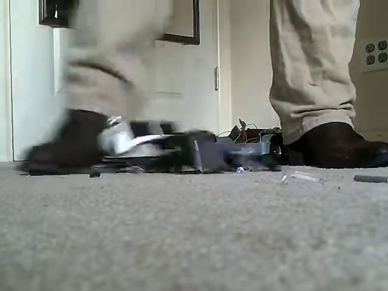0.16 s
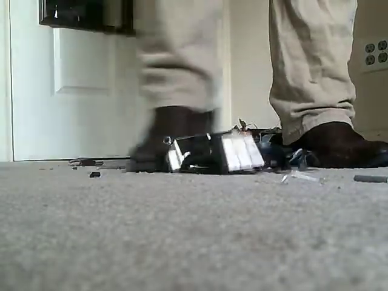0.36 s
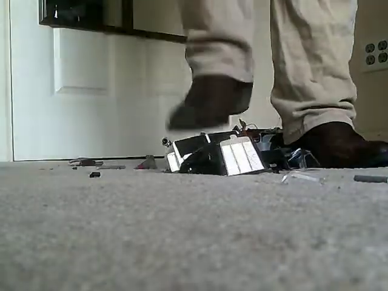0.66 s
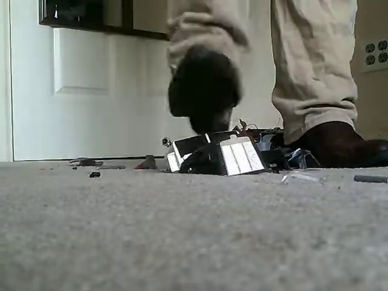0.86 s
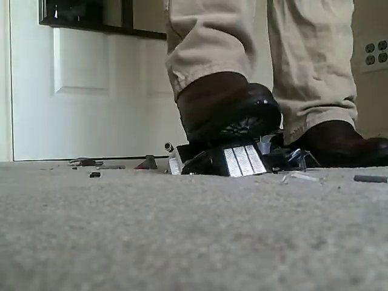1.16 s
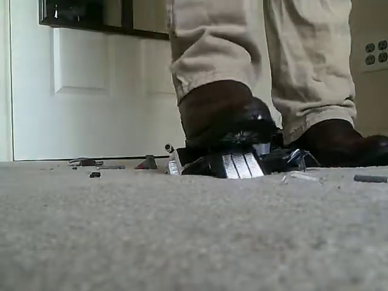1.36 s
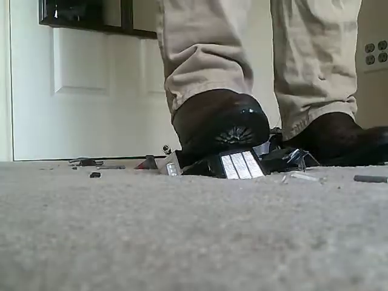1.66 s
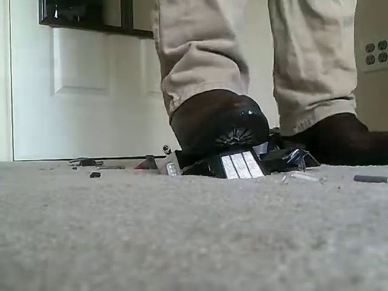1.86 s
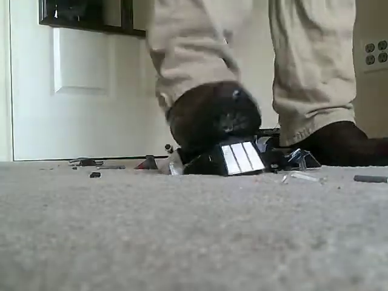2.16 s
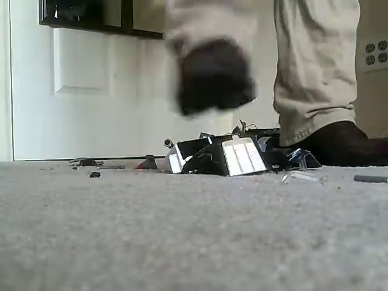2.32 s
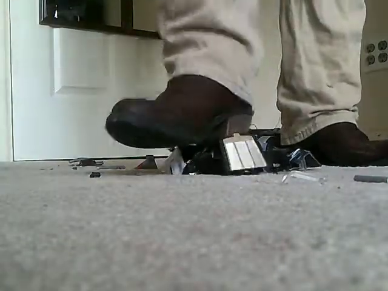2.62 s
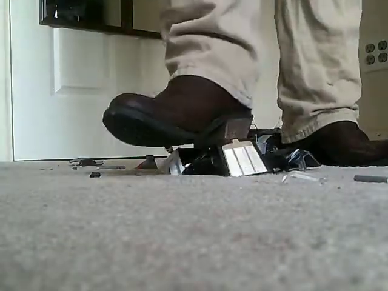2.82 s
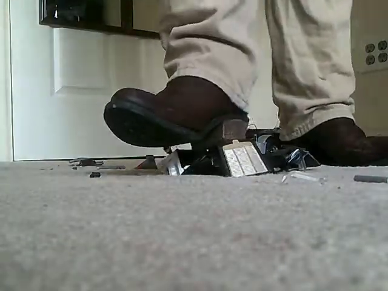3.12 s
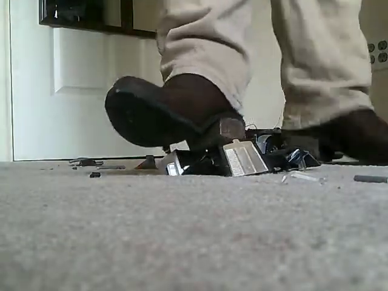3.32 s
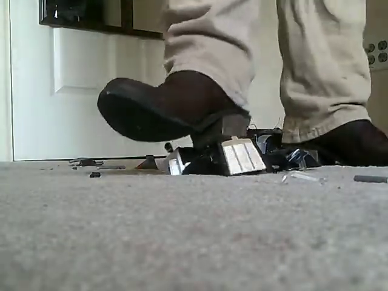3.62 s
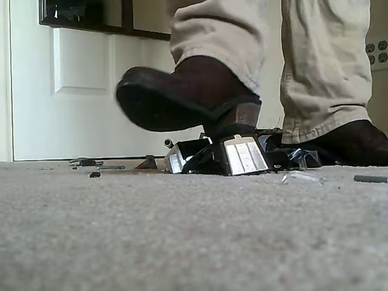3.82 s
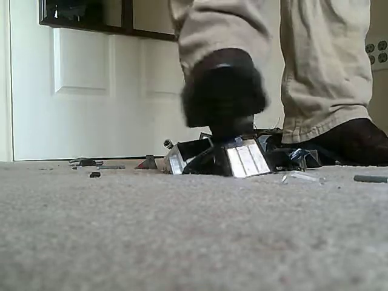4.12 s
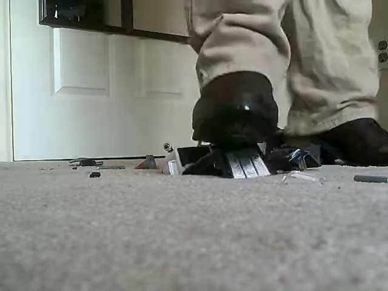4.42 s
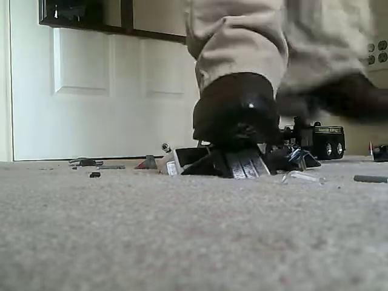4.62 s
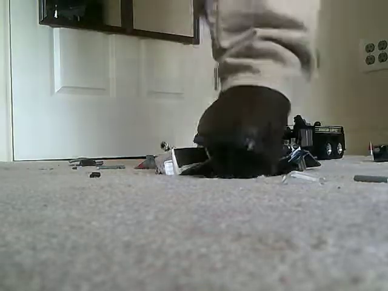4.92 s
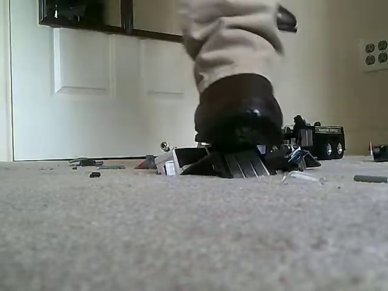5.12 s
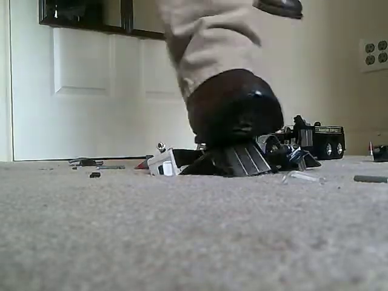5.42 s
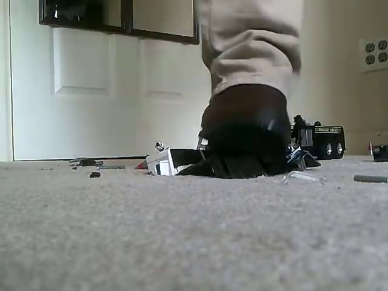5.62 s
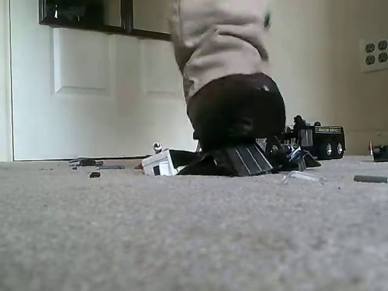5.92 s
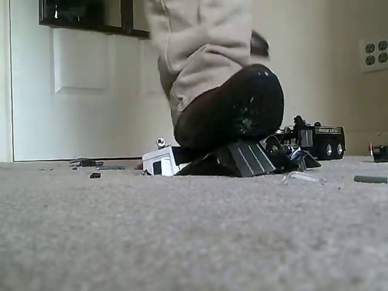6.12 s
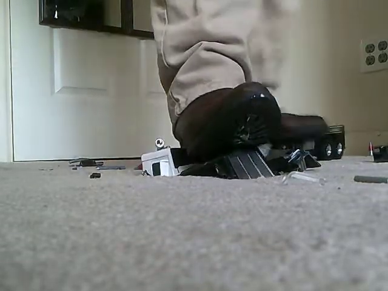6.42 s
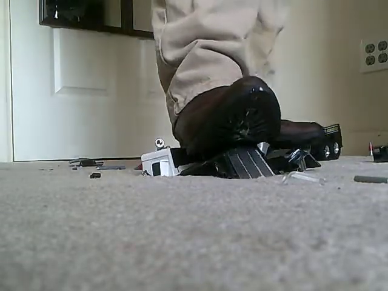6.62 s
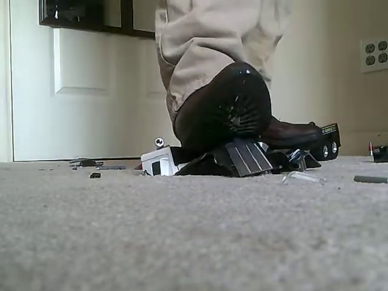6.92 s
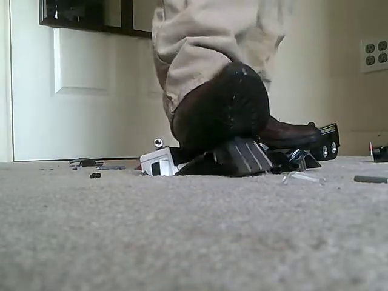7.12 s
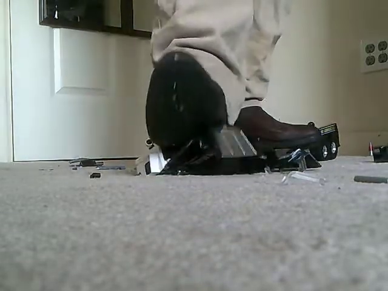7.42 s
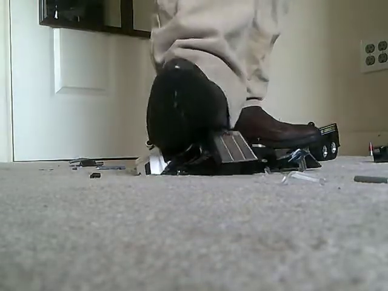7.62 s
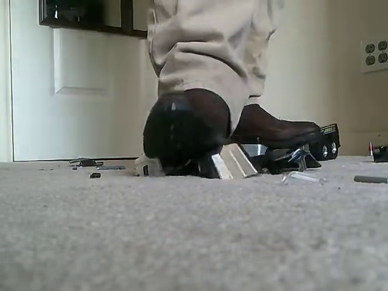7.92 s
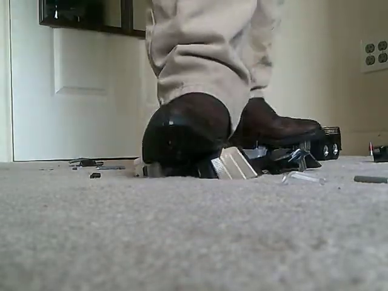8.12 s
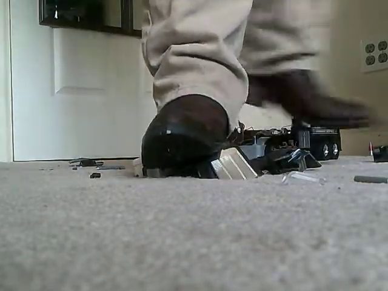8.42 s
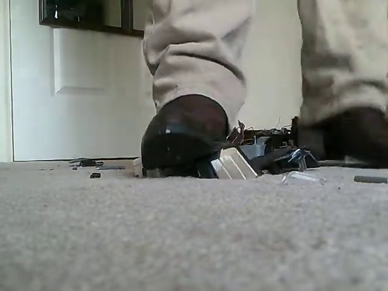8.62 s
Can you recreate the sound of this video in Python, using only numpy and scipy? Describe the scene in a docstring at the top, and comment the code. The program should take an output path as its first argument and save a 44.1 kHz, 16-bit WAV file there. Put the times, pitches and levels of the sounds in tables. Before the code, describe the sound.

A low house-fan hum with soft rushing air runs throughout in a small carpeted room, heard from about a metre away near the floor. From 0 to 0.5 s brittle plastic cracks and hollow rattles come in a quick cluster. Around 0.95 s a crunch and dull knock, with smaller snaps to 1.4. At 1.46 a loud, sharp crack lands with a deep floor boom. Another crunchy knock follows at 2.1, lighter clicks at 2.55, then near quiet, with a soft thud at 3.5 and faint ticks to 4.9. Hollow ringing cracks build at 5.1, 5.5 and 5.7. At 5.9-6.1 the heaviest stomp smashes the plastic in a dense, overloaded crunch with booming boards. A bright ringing crack at 6.37 leads to snaps, short rasps and knocks until 7.25. After a lull, small hollow crackles and a rasp come around 7.8-8.2, then faint rustle and hum.

```python
"""Plastic toy crushed under a boot

A boot cracks and crunches a hollow plastic toy on a carpeted floor, with the microphone a metre away on the carpet.
Noise tears excite shard and shell modes; hollow rings, stick-slip rasps and grains of crunching join them.
The floor knocks, booms and sways as damped modes and low noise, and crossfading noise tails give a small room.
A house fan hums behind as sines and filtered noise; the loudest blows saturate the input stage."""
import sys
import numpy as np
from scipy import signal
from scipy.fft import rfft, irfft
from scipy.io import wavfile
from scipy.ndimage import uniform_filter1d

SR = 44100
rng = np.random.default_rng(int(sys.argv[2]) if len(sys.argv) > 2 else 0)


def persist_wave(psi):
    """Save psi, clipped to +-1, as 16-bit WAV."""
    counts = np.round(np.clip(psi, -1, 1) * 32767).astype(np.int16)
    wavfile.write(sys.argv[1], SR, np.atleast_2d(counts).T)


def magnitude_from_level(level_db):
    """Linear magnitude for a level in decibels (20 dB per decade)."""
    exponent = np.asarray(level_db, float) / 20
    return 10 ** exponent


N = 386316
T = np.arange(N) / SR
RATTLE_DB = 3.5  # spread of the level as loose pieces chatter against a ringing part


def unit(x):
    """Normalisation: scale to rms 1."""
    return x / np.sqrt(np.mean(x ** 2))


def colour(x, points):
    """Minimum-phase filtering: a causal filter through (Hz, dB) points, from the cepstrum of the log gain."""
    hz, db = np.transpose(points)
    size = 2 ** 13
    grid_hz = np.arange(size + 1) * SR / size / 2
    log_gain = np.interp(np.log(grid_hz + 1), np.log(hz), db) * np.log(10) / 20
    cepstrum = irfft(log_gain)
    cepstrum[1:size] *= 2  # fold onto positive time
    response = irfft(np.exp(rfft(cepstrum[:size], 2 * size)))
    return signal.fftconvolve(x, response)[:N]


def band(x, hz, width):
    """Resonance: two poles, gain 1 at the centre."""
    return signal.lfilter(*signal.iirpeak(hz, hz / width, SR), x)


def decay(t, t60):
    """Exponential decay: 60 dB down after t60 seconds."""
    return np.exp(-np.log(1000) * t / t60)


def ring(t, hz, t60, phase=0):
    """Damped oscillation: a sine that decays exponentially."""
    return np.sin(2 * np.pi * hz * t + phase) * decay(t, t60)


def add(out, x, s):
    """Superposition: mix x in at time s."""
    i = int(s * SR)
    out[i:i + len(x)] += x[:len(out) - i]


def walk(rate):
    """Slow random modulation: levels held 1 / rate s and smoothed twice; spread near 1."""
    k = int(SR / rate)
    steps = np.repeat(rng.standard_normal(N // k + 1), k)
    return 1.3 * uniform_filter1d(uniform_filter1d(steps, k), k)[:N]


def wobble(size, hold):
    """Fast random modulation: noise averaged over hold seconds, rms 1."""
    return unit(uniform_filter1d(rng.standard_normal(size), int(hold * SR)))


def burst(db, held, fade):
    """Envelope: a quick rise, a hold, then a steady fall in dB per s."""
    t = T[:SR // 2]
    rise = 1 - np.exp(-t / 0.0045)
    return magnitude_from_level(db - fade * np.maximum(t - held, 0)) * rise


# Cracks of the plastic, levels before the room and the microphone
# columns: start_s, peak_db (of the ringing body), shard_pitch_hz, snap_db (rms)
CRACK_EVENTS = [(0.04, -11, 860, -28.5), (0.173, -40, 506, -40), (0.182, -19, 807, -50),
                (0.207, -14, 860, -36), (0.25, -10.5, 800, -27), (0.279, -13, 1200, -29),
                (0.302, -7.5, 1064, -27.5), (0.316, -13, 1060, -53), (0.431, -23.5, 970, -50),
                (0.518, -53, 740, -54), (0.915, -15, 735, -34), (0.956, -32, 700, -43),
                (0.978, -9.5, 552, -37.5), (1.178, -12.5, 817, -44.5), (1.283, -24.5, 935, -52.5),
                (1.29, -28, 790, -37.5), (1.311, -22.5, 840, -47.5), (1.355, -26, 813, -49),
                (1.43, -36, 694, -54.5), (1.461, 8.5, 798, -8), (1.941, -22.5, 756, -48.5),
                (2.112, -19, 770, -55), (2.128, -4, 740, -34), (2.153, -10.5, 501, -34),
                (2.205, -19.5, 785, -43), (2.54, -13.5, 606, -52), (2.563, -26, 586, -40),
                (2.591, -19, 590, -50), (3.495, -25, 623, -62), (3.655, -23, 800, -54),
                (3.69, -25, 920, -51), (4.112, -25, 950, -51.5), (4.259, -19.5, 717, -55),
                (4.279, -32, 770, -48.5), (4.328, -27, 1090, -51), (4.757, -23, 820, -57),
                (4.795, -22.5, 865, -58), (4.807, -18.5, 907, -55), (4.831, -18, 685, -58),
                (4.854, -20, 677, -60), (4.928, -14.5, 850, -41.5), (5.062, -8.5, 994, -30.5),
                (5.142, 2, 1001, -24), (5.323, -17.5, 920, -39), (5.352, -17, 793, -40.5),
                (5.514, -3, 780, -34.5), (5.56, -17, 1040, -33.5), (5.677, 6, 972, -20.5),
                (5.893, -10.5, 871, -42), (5.922, -9, 898, -24.5), (5.945, 4, 988, -8),
                (5.967, -5, 1282, -3), (5.976, -0.5, 591, -3), (5.99, 0.5, 693, -3.5),
                (5.999, 0, 725, -4.5), (6.339, -18.5, 1132, -45), (6.35, -6, 1180, -36),
                (6.371, 8, 1010, -14.5), (6.38, -3.5, 1000, -25), (6.39, -1, 995, -22.5),
                (6.472, -6.5, 740, -43), (6.542, -11, 730, -40), (6.621, -6.5, 1173, -31.5),
                (6.653, -11.5, 740, -37), (6.689, -14, 687, -51), (6.712, -13, 690, -38),
                (6.772, -22.5, 770, -34.5), (6.955, -24.5, 1030, -50.5), (7.082, -25, 608, -65),
                (7.146, -13, 985, -48.5), (7.249, -5, 904, -25), (7.813, -26.5, 970, -48.5),
                (7.939, -13.5, 1126, -56), (7.957, -13, 866, -56), (7.978, -9.5, 720, -57),
                (8.028, -21.5, 760, -60), (8.085, -25.5, 840, -63), (8.184, -22.5, 973, -61)]


def cracks():
    """Impulsive excitation: each tear rings shard and shell, and a bright snap rides on its front."""
    out = np.zeros(N)
    for s, peak_db, shard_hz, snap_db in CRACK_EVENTS:
        tear = tearing(peak_db)
        body = crack_body(tear, shard_hz)
        add(out, magnitude_from_level(peak_db) * body / np.abs(body).max(), s)
        add(out, crack_snap(tear, peak_db, snap_db), s)
    return out


def tearing(peak_db):
    """Fracture noise: cubed noise makes sparse spikes, in a sharp burst with a weak, longer train of aftershocks."""
    t = T[:SR // 25]
    fall = np.exp(-t / 0.00045) + magnitude_from_level(-19) * np.exp(-t / 0.011)
    rise_s = 0.00019 * magnitude_from_level(-0.5 * peak_db)  # soft cracks tear open more slowly
    return rng.standard_normal(len(t)) ** 3 * fall * (1 - np.exp(-t / rise_s))


# Modes of the hollow toy body; level and pitch are nominal
# columns: pitch_hz, level_db, t60_s
SHELL_MODES = [(454, -14.5, 0.06), (562, -8, 0.015), (770, -3, 0.0098), (820, -0.5, 0.032),
               (920, -8.5, 0.018), (1020, -4.5, .06), (1277, -13, 0.029), (1595, -17, 0.033),
               (1748, -10.5, 0.045), (1940, -20.5, 0.036), (2390, -20.5, 0.043), (2760, -20.5, .03),
               (2920, -25.5, .03)]


def crack_body(tear, shard_hz):
    """Modal response: the tear convolved with damped modes of the shard and the shell."""
    t = T[:SR // 8]
    hz, db, t60 = np.transpose(SHELL_MODES)[:, :, None]
    # the sole damps and bends the shell differently at every crack
    level_chance, pitch_chance = rng.standard_normal((len(SHELL_MODES), 2)).T[:, :, None]
    bent_hz = hz * (1 + 0.088 * pitch_chance)
    shell = np.sum(magnitude_from_level(db + 7.1 * level_chance) * ring(t, bent_hz, t60), axis=0)
    partials = [(1, -2.5), (0.99, 5.0), (0.77, -5.5), (0.52, -17.5)]  # pitch ratio, dB
    shard = sum(magnitude_from_level(gain_db) * ring(t, ratio * shard_hz, 0.022) for ratio, gain_db in partials)
    push = uniform_filter1d(tear, size=9)  # thick plastic gives way over a fifth of a millisecond
    body = signal.fftconvolve(push, shard + magnitude_from_level(-6.0) * shell)
    return body * magnitude_from_level(RATTLE_DB * wobble(len(body), 0.0039))


def crack_snap(tear, peak_db, snap_db):
    """Resonant filtering: broad bands pass the treble of the tear, with a thin top above."""
    snap_hz = 2313 * np.exp(0.21 * rng.standard_normal())  # scatters from crack to crack
    snap = band(tear, snap_hz, 870) + magnitude_from_level(-4.5) * band(tear, 3700, 3500)
    snap = band(snap, 2800, 4300)
    thin = band(band(tear, 5300, 3500), 5300, 3500)
    thin_db = -28 + 0.8 * peak_db + 0.6 * snap_db  # grows with both the peak and the snap
    return magnitude_from_level(snap_db) * unit(snap) + magnitude_from_level(thin_db) * unit(thin)


# The hollow toy rings on when the sole lets it
# columns: start_s, level_db (before the chatter), pitch_hz (at the start)
HOLLOW_RINGS = [(0.044, -21.5, 1140), (0.308, -23, 1104), (0.435, -37, 1008), (5.144, -19, 1036),
                (5.518, -24.5, 1048), (5.68, -10, 1009), (6.377, -4.5, 955.5), (7.98, -29, 897)]


def hollow():
    """Damped oscillation: a rough ring climbs as the toy is squeezed, with a weaker neighbour below."""
    out, t = np.zeros(N), T[:SR // 5]
    t60_s, glide_per_s, wobble_rad = 0.19, 1.3, 0.8
    for s, db, hz in HOLLOW_RINGS:
        for ratio, gain_db in [(1, -0.5), (.9, -7)]:
            climbing_hz = ratio * hz * (1 + glide_per_s * t / 2)  # half, as phase integrates pitch
            tone = ring(t, climbing_hz, t60_s, wobble_rad * wobble(len(t), 0.011))
            level = magnitude_from_level(db + gain_db + RATTLE_DB * wobble(len(t), 0.0065))
            add(out, level * tone * (1 - np.exp(-t / 0.0022)), s)
    return out


# A plate drags under the sole and rasps at its own pitch
# columns: start_s, level_db, held_s, pitch_hz
RASP_EVENTS = [(0.204, -31, .015, 2550), (6.441, -36, 0.077, 2300), (6.622, -36.5, 0.11, 2150),
               (7.94, -35.5, 0.049, 2000)]


def rasp():
    """Stick-slip friction: uneven clicks drive one narrow resonance."""
    out = np.zeros(N)
    slips_per_s, width_hz, fade_db_per_s = 370, 320, 400
    for s, db, held, hz in RASP_EVENTS:
        shape = burst(db, held, fade_db_per_s)
        slips = rng.standard_normal(len(shape)) * (rng.random(len(shape)) < slips_per_s / SR)
        tone = band(band(slips, hz, width_hz), hz, 2 * width_hz)
        add(out, shape * unit(tone), s)
    return out


def fractures():
    """Granular excitation: each shell mode is struck by its own patter, some grains louder than the rest."""
    low, high = np.zeros(N), np.zeros(N)
    for hz, db, _ in SHELL_MODES:
        at = rng.integers(0, N, size=N // 80)
        strength = rng.standard_normal(len(at)) * magnitude_from_level(2.4 * rng.exponential(size=len(at)))
        grains = np.bincount(at, strength, N)
        mode = band(band(grains, hz, 0.17 * hz), hz, 2.1 * hz)
        add(low if hz < 1600 else high, magnitude_from_level(0.6 * db) * mode, 0)
    return unit(low), unit(high)


# Bursts of dense crunching under the sole
# columns: start_s, low_modes_db, high_modes_db, held_s, low_fade_db_per_s
CRUNCH_BURSTS = [(0.043, -23, -20.5, 0.0055, 206), (0.18, -32, -38, .005, 451),
                 (0.206, -29.5, -26, .005, 303), (0.25, -28, -30, .065, 351),
                 (0.916, -24, -28.5, 0.012, 500), (0.977, -28, -19.5, 0.0043, 1205),
                 (1.177, -28.5, -52, 0.0057, 500), (1.283, -35, -46, 0.018, 497),
                 (1.461, -7.5, -13, .004, 451.5), (2.106, -13, -22, 0.0065, 1502),
                 (2.127, -19, -22, 0.0083, 452), (2.153, -29, -32, 0.0092, 352),
                 (2.21, -38, -43, 0.016, 300), (2.54, -35.5, -35, 0.022, 600), (2.585, -36, -32, .004, 450),
                 (3.65, -46, -50, 0.052, 300), (4.11, -45, -53, 0.0088, 500),
                 (4.182, -37.5, -47, .005, 202), (4.258, -45, -46, .005, 280), (4.79, -47, -69, 0.044, 402),
                 (5.14, -20, -38, 0.0035, 303), (5.508, -28.5, -49, 0.003, 260),
                 (5.675, -22, -41.5, 0.0035, 308), (5.892, -26, -41, 0.0028, 903),
                 (5.92, -23, -28, .004, 1500), (5.943, 0.5, -10.5, 0.037, 289),
                 (6.365, -10, -20.5, 0.0088, 180), (6.458, -15.5, -21, 0.021, 443),
                 (6.518, -23, -31, 0.011, 274), (6.619, -28, -43, 0.063, 300), (6.772, -41, -36, .004, 396),
                 (6.952, -43, -59, 0.027, 244), (7.247, -19.5, -34, .004, 494),
                 (7.935, -24, -44, 0.021, 349), (8.02, -39.5, -63, 0.095, 503),
                 (8.174, -45.5, -70, 0.052, 301)]


def crunch(low, high):
    """Amplitude modulation: bursts shape the tiny fractures, the high modes fading faster."""
    body, bright = np.zeros(N), np.zeros(N)
    for s, low_db, high_db, held, fade in CRUNCH_BURSTS:
        add(body, burst(low_db, held, fade), s)
        add(bright, burst(high_db, held, 1.82 * fade), s)
    return body * low + bright * high


# Faint rustle of shifting pieces, joined by straight lines in dB
# columns: time_s, level_db (of the low modes, before the random wander)
RUSTLE_LEVEL = [(0, -49.5), (.55, -57.5), (.8, -60), (3.4, -58.5), (3.7, -54.5), (4.3, -59), (4.85, -51.5),
                (5.6, -51), (7.2, -56), (7.6, -59.5), (8.1, -58.5), (8.7, -61.5)]


def rustle(low, high):
    """Amplitude modulation: the same fractures at a faint, randomly wandering level."""
    level = magnitude_from_level(np.interp(T, *np.transpose(RUSTLE_LEVEL)) + 4.4 * walk(25))
    return level * (low + magnitude_from_level(-11.5) * high)


# The floor takes the weight
# columns: start_s, knock_db (peak before the soft onset), knock_pitch_hz (nominal), boom_db (of its 44 Hz mode)
FLOOR_BLOWS = [(0.979, -12, 204, -38), (1.465, 4.5, 178.2, -8), (2.128, -6, 171, -19),
               (3.349, -46, 137, -28), (3.492, -17, 111, -55), (4.751, -28, 96.5, -24.5),
               (5.139, -19, 151, -31), (5.323, -16.5, 154, -27), (5.516, -14.5, 110, -29),
               (5.673, -24, 210, -35.5), (5.919, -9.5, 100, -21), (5.946, 6.5, 92.8, -4),
               (5.978, 4.5, 109, -2.5), (6.031, 2, 102, -30), (6.09, -16, 114.6, -17),
               (6.372, -5.5, 323, -34), (6.687, -23, 115.8, -24), (6.777, -13, 185, -42),
               (7.079, -16.5, 100, -48), (7.146, -21.5, 108.3, -51), (7.247, -8, 167.4, -23)]


def floor():
    """Modal response: blows knock the boards at a dull note with short overtones, over a deep boom."""
    out, t = np.zeros(N), T[:SR // 2]
    boom = ring(t, 44, .25) + magnitude_from_level(-7) * ring(t, 68, .15) + magnitude_from_level(-3) * ring(t, 104, .25)
    mode_gain = magnitude_from_level([[-4], [0], [-4], [-6], [-7], [-9]])
    for s, knock_db, hz, boom_db in FLOOR_BLOWS:
        ratio = np.array([[.7], [1], [1.4], [2.1], [3.1], [4.6]])
        ratio = ratio * (1 + 0.13 * rng.standard_normal((6, 1)))
        t60 = 0.094 / ratio ** 0.09  # higher modes die slightly sooner
        knock = np.sum(mode_gain * ring(t, hz * ratio, t60), axis=0)
        blow = magnitude_from_level(knock_db) * knock / np.abs(knock).max() + magnitude_from_level(boom_db) * boom
        add(out, blow * (1 - np.exp(-t / 0.0017)), s)
    return out


def room(x, count=3):
    """Reverberation: decaying noise tails crossfade in turn, so the small room's echo colour keeps varying."""
    out = np.zeros(N)
    for k in range(count):
        share = 2 / count * np.cos(np.pi * (6.0 * T + k / count)) ** 2  # six cycles a second
        out = out + signal.oaconvolve(x * share, tail())[:N]
    return out


# Bands of the room's dense tail
# columns: pitch_hz, t60_s, level_db
ROOM_BANDS = [(159, 0.16, 0.5), (533, 0.13, -4.5), (1420, 0.27, -7), (4000, 0.067, -8.5), (7460, 0.3, -2)]
# Reflections from the nearest walls
# columns: delay_s, level_db
WALL_ECHOES = [(.0055, -19), (.015, -15.5), (.025, -21.5)]


def tail():
    """Impulse response: clear early reflections and dense noise, each band fading at its own pace."""
    t = T[:SR // 3]
    out = np.zeros(len(t))
    for hz, t60, db in ROOM_BANDS:
        part = band(rng.standard_normal(len(t)), hz, hz) * decay(t, t60)
        part = part * (1 - np.exp(-(t / 0.0059) ** 2))  # gradual build-up
        out = out + magnitude_from_level(db) * part * np.sqrt(2 * hz / SR / np.sum(part ** 2))
    for s, db in WALL_ECHOES:
        add(out, magnitude_from_level([db]), s)
    return out


# Slow sway of the floor as the weight shifts, joined by straight lines in dB
# columns: time_s, level_db
SWAY_LEVEL = [(0.0, -44), (0.8, -49), (1.31, -44), (1.48, -28), (1.87, -48), (2.2, -37), (2.75, -43),
              (3.93, -44), (5.19, -29), (5.82, -32), (5.96, -19), (6.35, -35), (7.12, -48), (8.7, -44)]


def sway():
    """Low-frequency flexure: noise around 11 Hz, as the boards flex below pitch under the shifting weight."""
    flex = band(band(rng.standard_normal(N), 11, 10), 11, 10)
    return magnitude_from_level(np.interp(T, *np.transpose(SWAY_LEVEL))) * unit(flex)


def fan():
    """Superposition: shaft line, motor hum and smooth rushing air."""
    return fan_shaft() + fan_hum() + fan_air()


# Level of the fan's shaft line, joined by straight lines in dB
# columns: time_s, level_db (rms, before the random wander)
SHAFT_LEVEL = [(0.0, -31.5), (2.2, -31), (3.0, -32.5), (4.84, -29.5), (5.64, -29.5), (6.8, -29.5),
               (8.068, -35), (8.701, -29)]


def fan_shaft():
    """Rotation tone: a sine near 26.7 Hz whose pitch and level wander."""
    s, db = np.transpose(SHAFT_LEVEL)
    phase = 2 * np.pi * np.cumsum(26.7 * (1 + 0.019 * walk(1.7))) / SR
    level = magnitude_from_level(np.interp(T, s, db) + 0.97 * walk(3.5))
    return np.sqrt(2) * level * np.sin(phase)


# Lines of the motor hum
# columns: pitch_hz, level_db (rms, before the random wander)
HUM_LINES = [(60.0, -43.5), (120.0, -43), (146, -57.5), (230, -61), (319, -53)]


def fan_hum():
    """Additive synthesis: steady sines, each level wandering a little."""
    out = np.zeros(N)
    for hz, db in HUM_LINES:
        level = np.sqrt(2) * magnitude_from_level(db + 0.47 * walk(4.4))
        out = out + level * np.sin(2 * np.pi * (hz * T + rng.random()))
    return out


# Spectrum of the rushing air; only its shape counts
# columns: pitch_hz, level_db (filter gain)
AIR_SPECTRUM = [(18, -14), (40, -23), (80, -14.5), (130, -17), (311, -18), (395, -21.5), (490, -22.5),
                (1050, -27.5), (1500, -38.5), (3200, -55.5), (4840, -74), (7260, -62), (9000, -80),
                (11700, -120)]


def fan_air():
    """Turbulence noise: coloured noise, its level set in a band around 880 Hz."""
    air = colour(rng.standard_normal(N), AIR_SPECTRUM)
    return air / np.std(band(air, 880, 670)) * magnitude_from_level(-47.5 + 0.5 * walk(1.5))


# Colour of the microphone
# columns: pitch_hz, gain_db
MIC_RESPONSE = [(20, 1.5), (1200, -3), (3000, -11), (5200, -29.5), (6500, -19.5), (7600, -19.5),
                (8600, -31), (10000, -62.5), (20000, -70)]


def scene():
    """Linear transmission: toy and floor in the room take the microphone's colour; sway and fan are added after."""
    low, high = fractures()
    near = cracks() + hollow() + rasp() + crunch(low, high) + rustle(low, high) + floor()
    heard = colour(near + room(near), MIC_RESPONSE)
    return (heard + sway() + fan())[None]


def top_cut(x):
    """Nothing passes above the cut-off."""
    return signal.sosfilt(signal.butter(12, 16500, fs=SR, output="sos"), x)


def record(dry):
    """Saturation: the input stage flattens peaks at a ceiling with a rounded knee, then dulls the very top."""
    ceiling, knee = .72, 8.0  # full scale is 1; a higher knee is sharper
    flat = dry / (1 + np.abs(dry / ceiling) ** knee) ** (1 / knee)
    mix = colour(flat[0], [(7500, 0), (10500, -6.5), (20000, -5.5)])[None]
    return top_cut(mix)


dry = scene()
out = record(dry)
persist_wave(out)
```